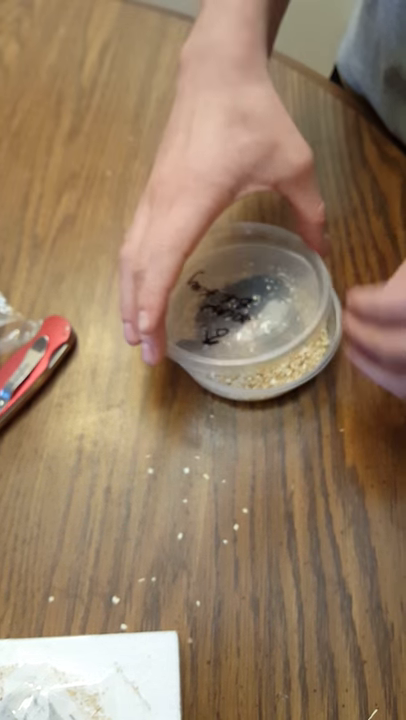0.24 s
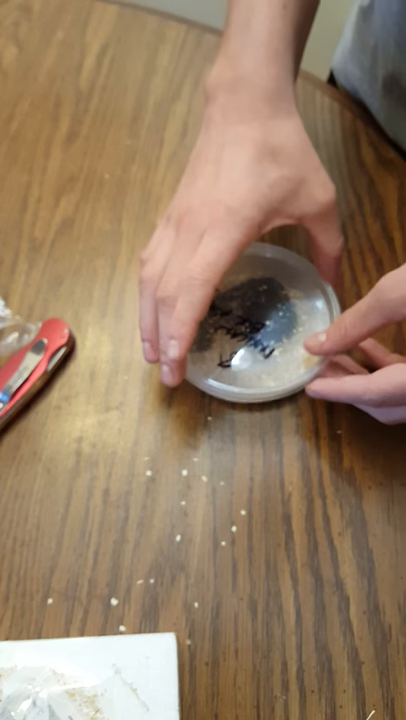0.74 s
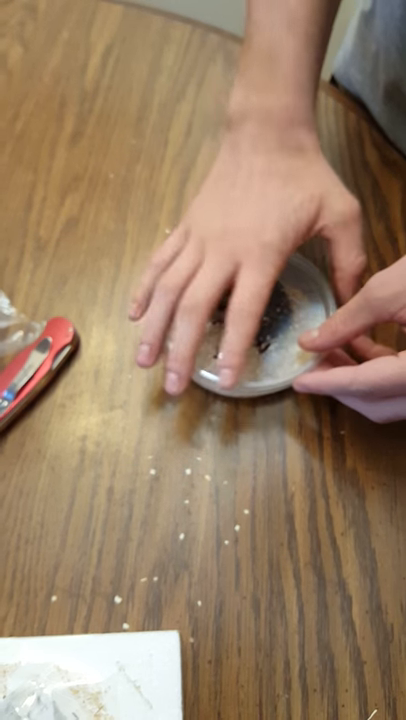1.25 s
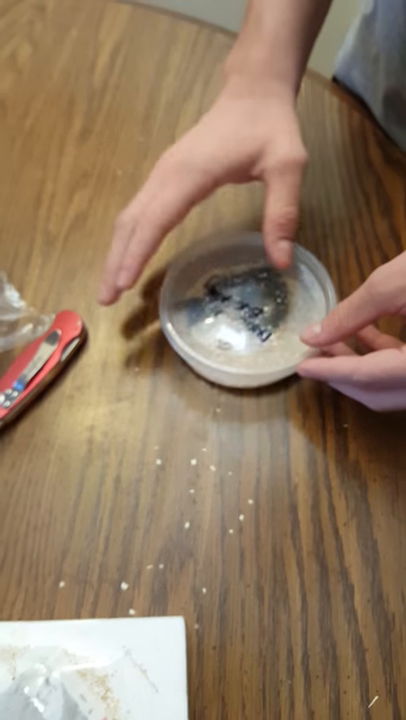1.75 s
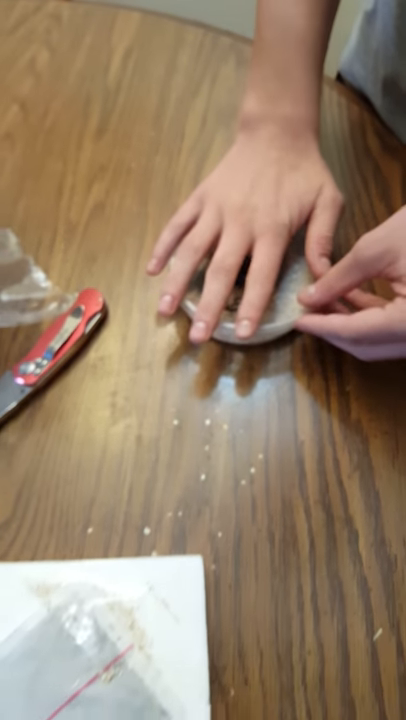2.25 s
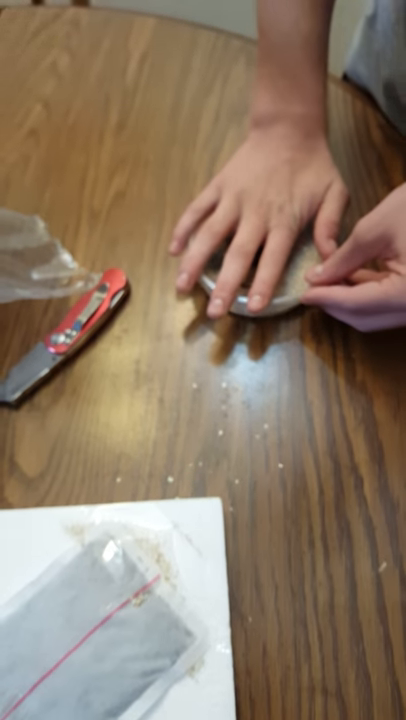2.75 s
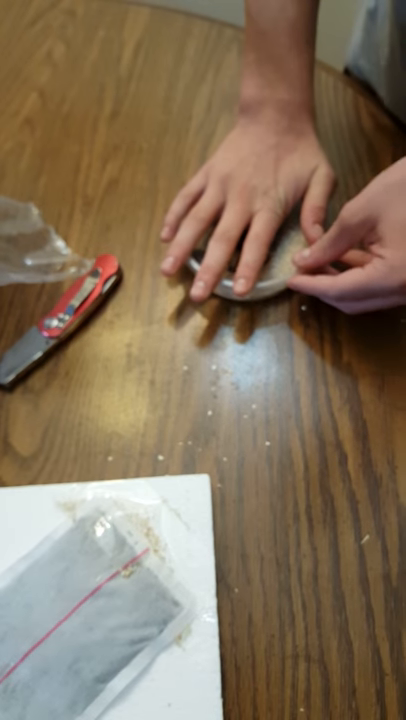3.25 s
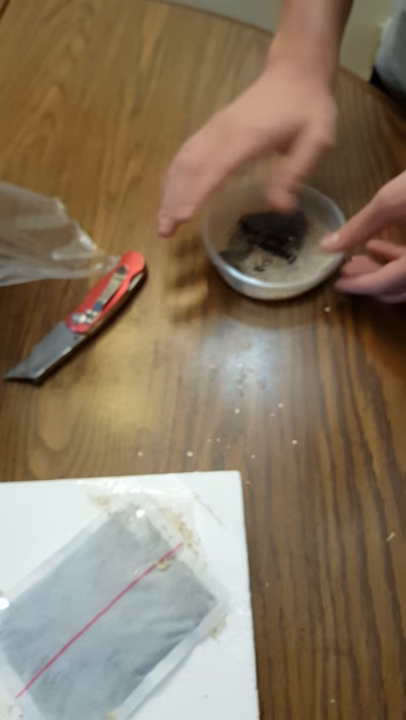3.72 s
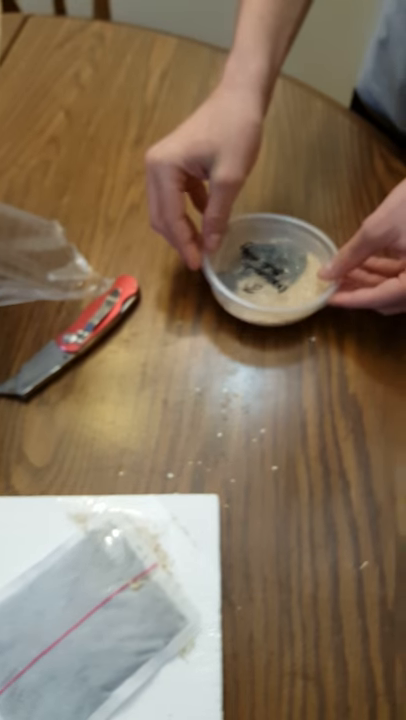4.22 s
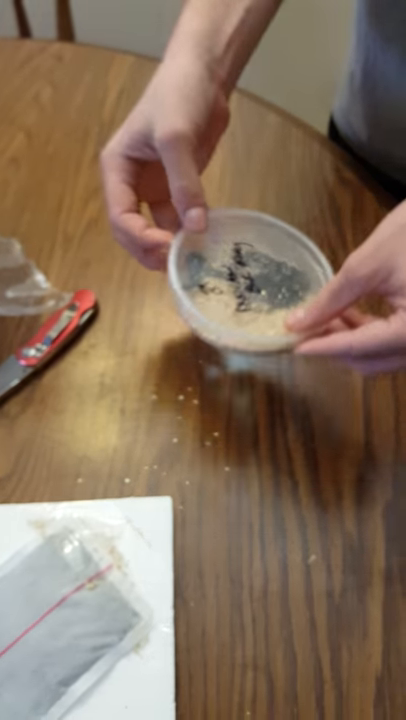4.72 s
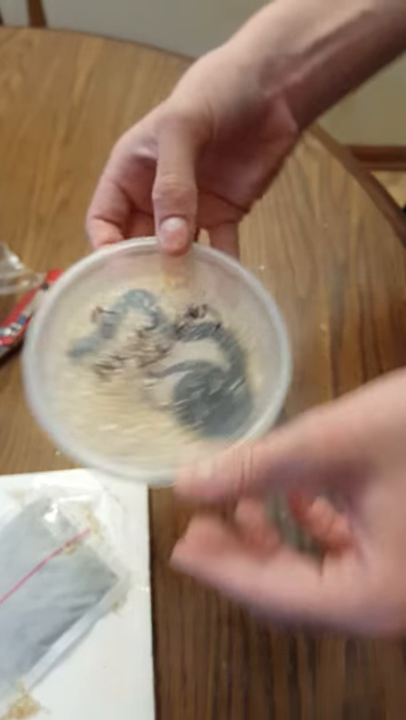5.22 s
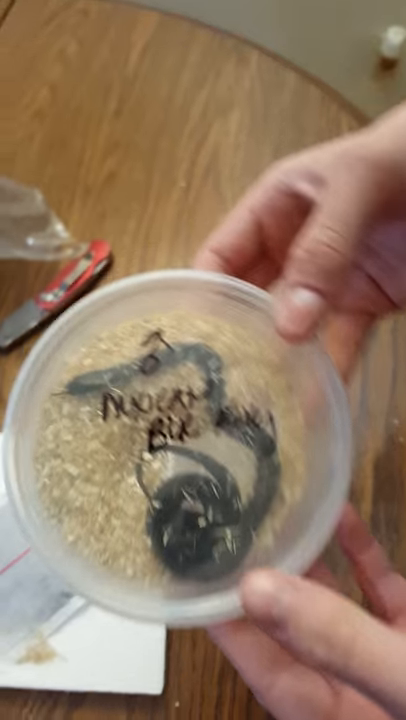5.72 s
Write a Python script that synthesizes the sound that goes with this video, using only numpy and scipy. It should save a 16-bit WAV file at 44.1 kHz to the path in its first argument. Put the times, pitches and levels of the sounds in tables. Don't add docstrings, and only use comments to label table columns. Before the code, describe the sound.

Close stereo microphone in a quiet room with a faint low hum. A loose plastic lid rattles and dry bedding trickles, then the rim slips in small hollow ticks. Pressed harder, it snaps loudly with a thump into the wooden table and zips shut. A short creak, skin rubbing, scuffs on wood and a distant hollow knock follow.

```python
import sys
import numpy as np
from scipy import signal
from scipy.fft import rfft, irfft
from scipy.io import wavfile

SR = 44100
rng = np.random.default_rng(int(sys.argv[2]) if len(sys.argv) > 2 else 0)


def decibels_to_gain(level_db):
    exponent = np.asarray(level_db, float) / 20
    return 10 ** exponent


def materialize(psi):
    bounded = np.clip(np.atleast_2d(psi).T, -1, 1)
    quanta = np.round(bounded * 32767).astype(np.int16)
    wavfile.write(sys.argv[1], SR, quanta)


N = 263277

# frequency in Hz, left-right likeness from -1 to 1.
LIKENESS = [(60, 0.57), (170, 0.81), (340, 0.38), (700, 0.22), (1400, -0.56), (2500, 0.052), (8000, -0.19)]
PORT_LAG = 4


def rms_one(x):
    return x / np.sqrt(np.mean(x ** 2) + 1e-20)


def peak_one(x):
    return x / (np.max(np.abs(x)) + 1e-20)


def in_time(rows):
    s, *columns = np.transpose(rows)
    return [np.interp(np.arange(N) / SR, s, c) for c in columns]


def at_hz(points, hz):
    point_hz, value = np.array(points).T
    return np.interp(np.log(hz), np.log(point_hz), value)


def drift(rate):
    r = np.exp(-80 * np.pi * rate / SR)
    white = rng.standard_normal(N // 40 + 2002)
    slow = signal.lfilter([1], [1, -2 * r, r * r], white)[2000:]
    return np.interp(np.arange(N) / 40, np.arange(len(slow)), rms_one(slow))


def ring(x, hz, t60):
    r, w = decibels_to_gain(-60 / (t60 * SR)), 2 * np.pi * hz / SR
    return signal.lfilter([0, np.sin(w)], [1, -2 * r * np.cos(w), r * r], x + 1e-18)


def resonance(x, hz, width_hz):
    r = np.exp(-np.pi * width_hz / SR)
    top = np.array([1, 0, -1]) * (1 - r * r) / 2
    return signal.lfilter(top, [1, -2 * r * np.cos(2 * np.pi * hz / SR), r * r], x)


def band(x, low_hz, high_hz):
    return signal.sosfilt(signal.butter(2, [low_hz, min(high_hz, .45 * SR)], "band", fs=SR, output="sos"), x)


def add(out, sound, s, pan_db):
    at = round(s * SR)
    out[:, at:at + len(sound)] += decibels_to_gain([[pan_db / 2], [-pan_db / 2]]) * sound[:N - at]


def burst(length_ms, noise):
    u = np.arange(len(noise)) / SR / max(length_ms * 0.0011, 2e-4)
    return u * np.exp(-2 * u) * noise * np.abs(noise)


def stereo_noise(mid, side, hz):
    alike = np.clip(at_hz(LIKENESS, hz), -1, 1)
    return np.sqrt(1 + alike) * mid + np.sqrt(1 - alike) * side * [[1], [-1]]


def appliance_hum():
    # centre in Hz, width in Hz, level in dB rms.
    hums = [(120.64, 7, -75.5), (65.3, 2.9, -83.5), (238.9, 16.6, -77.5)]
    shake = rng.standard_normal(N)
    hum = sum(decibels_to_gain(db) * rms_one(resonance(resonance(shake, hz, w), hz, w)) for hz, w, db in hums)
    line_hz, line_db = 120, -75.5
    phase = 2 * np.pi * line_hz * np.arange(N) / SR + 0.74 * drift(1.33)
    return hum + decibels_to_gain(line_db) * np.sqrt(2) * np.sin(phase)


def room_air():
    # frequency in Hz, level in dB per Hz.
    air_spectrum = [(15, -48), (25, -15), (92, -15.5), (123, 4.5), (185, -20), (242, -6.5), (373, -13.5),
                    (575, -15.5), (796, -11.5), (863, -15.5), (1190, -18), (1400, -16), (3250, -25),
                    (6210, -43.5), (16000, -31.5)]
    out, together, edges = 0, drift(1.5), 22 * 2 ** np.arange(0, 9.6, .5)
    white = rng.standard_normal((2, 2, N))
    for k, (low, high) in enumerate(zip(edges, edges[1:])):
        mid, side = band(white[k % 2], low, high)
        hz = np.sqrt(low * high)
        out = out + decibels_to_gain(at_hz(air_spectrum, hz) + 0.2 * together) * stereo_noise(mid, side, hz)
    return decibels_to_gain(-64.5) * rms_one(out)


def room(x):
    # frequency in Hz, decay t60 in seconds.
    decay = [(100, 0.41), (400, 0.32), (1000, 0.34), (3000, 0.33), (8000, 0.19), (15000, 0.12)]
    t, echo = np.arange(SR // 2) / SR, 0
    white = rng.standard_normal((2, len(t)))
    for low in 60 * 2. ** np.arange(8):
        mid, side = band(white, low, 2 * low)
        echo = echo + stereo_noise(mid, side, 1.25 * low) * decibels_to_gain(-60 * t / at_hz(decay, 1.66 * low))
    echo *= np.clip((t - .003) / 0.0022, 0, 1)
    return signal.fftconvolve(x[None], echo / np.sqrt(np.sum(echo ** 2) / 2))[:, :N]


def far_knock():
    # start in seconds, peak in dB.
    knocks = [
        (5.198, -27),
    ]
    # frequency in Hz, level in dB, t60 in seconds.
    hollow = [(561, -4.5, 0.035), (706, -1.5, 0.0197), (970, -4.5, 0.055), (1560, 0, 0.015),
              (2270, 1, 0.0047)]
    blow, rattle = np.zeros((2, N))
    for s, db in knocks:
        at = round(s * SR)
        blow[at] = decibels_to_gain(db - 6.5)
        rattle[at:][:3000] = decibels_to_gain(db - 13.5) * peak_one(burst(12.6, rng.standard_normal(3000)))
    push = band(blow, 190, 1300) + decibels_to_gain(-13.0) * rattle
    body = sum(decibels_to_gain(db) * ring(push, hz, t60) for hz, db, t60 in hollow)
    return body + decibels_to_gain(-16) * band(rattle, 900, 3200)


def table():
    # start in seconds, peak in dB, sharpness in Hz, sway of the legs in dB.
    thumps = [
        (2.138, -46, 497, -13),
        (2.653, -28, 515, -4),
        (2.821, -33, 475, -4),
        (2.98, -48, 500, 0),
        (3.139, -53.5, 500, 4),
        (4.404, -50, 700, -30),
        (5.057, -47, 500, 6.5),
    ]
    # frequency in Hz, level in dB, t60 in seconds.
    top_modes = [(42, -1.5, 0.37), (130.7, -6.5, 0.33), (141.2, -13, 0.36), (197, 4, 0.071),
                 (305, 4, 0.062), (414, 4.5, 0.075), (557, -7, 0.081)]
    out, strength = np.zeros((2, N)), rng.normal(0, 4.6, (len(thumps), len(top_modes)))
    for (s, db, sharp_hz, sway_db), own_db in zip(thumps, strength):
        push = np.exp(-2 * np.pi * sharp_hz * np.arange(16000) / SR)
        sway, *modes = [decibels_to_gain(mode_db + o) * ring(push, hz, t60)
                        for (hz, mode_db, t60), o in zip(top_modes, own_db)]
        add(out, decibels_to_gain(db) * peak_one(sum(modes) + decibels_to_gain(sway_db) * sway), s, 0)
    return out


def bedding():
    # time in seconds, level in dB.
    trickle = [(0.0, -63), (0.06, -55), (0.085, -61.5), (0.105, -58), (0.135, -60), (0.178, -53.5),
               (0.203, -55), (0.21, -62.5), (0.26, -77)]
    # centre in Hz, width in Hz, level in dB.
    plastic = [(1400, 490, 1), (6000, 900, -5.5), (7800, 900, -0.5), (8740, 620, 6), (9100, 600, 2),
               (9740, 570, -1.5), (12500, 3300, -14.5)]
    grains = rng.standard_normal((2, N)) * (rng.random((2, N)) < 5000 / SR)
    rustle = sum((-1) ** k * decibels_to_gain(db) * resonance(grains, hz, w) for k, (hz, w, db) in enumerate(plastic))
    level_db, = in_time(trickle + [(trickle[-1][0] + 0.058, -120)])
    return decibels_to_gain(level_db + 2.2 * drift(60)) * rms_one(rustle)


def stroke_gains():
    # crest in seconds, peak in dB, seconds to swell 20 dB, seconds to fade 20 dB,
    # lightness of touch in dB.
    fingers = [(0.01, -64, 3, 0.21, 4), (0.06, -61, -0.15, 0.14, 0), (0.185, -59.5, 0.15, -0.09, 0),
               (0.7, -76, -0.5, 0.5, 2.5), (1.03, -68.5, -0.17, 0.33, 1.5), (1.29, -66, -0.2, 0.55, -6.5),
               (1.87, -60.5, 0.07, 0.24, 0), (2.046, -67, 0.07, 0.6, 0.7), (2.258, -67.5, 0, 0.2, -1),
               (2.815, -54.5, 0.05, 0.18, 3), (3.53, -69, 0.1, 0.6, -4.5), (4.006, -66, 0.02, 0.14, 2.5),
               (4.377, -62, 0.18, 0.15, -6), (4.468, -61.5, 0.13, 0.13, 3), (4.64, -77, 1, 0.3, -1),
               (5.06, -64.5, -0.07, 0.6, -1.5), (5.155, -63, 0.01, 0.22, 4.5), (5.55, -80, 0, 17, 6.5),
               (5.85, -80, 1.5, 11, 2.5)]
    flexes = [(0.966, -59, 0.38, 0.23, 0.5), (1.15, -64.5, .1, 0.45, 9), (2.17, -56.5, 0.083, 0.13, -8.5),
              (2.3, -66.5, .08, 0.2, 7), (2.695, -45, 0.067, 0.075, -8), (2.735, -51.5, 0.05, 0.055, -13),
              (2.19, -61.5, .04, .1, 0), (1.04, -63, .05, 0.04, -6), (2.89, -47.5, 0.14, 0.052, 0.5),
              (2.955, -63.5, 0.055, 0.089, 11), (3.2, -57, 0.063, 0.11, -2),
              (3.255, -53.5, 0.07, 0.12, -5.5), (3.38, -70.5, 0.088, 0.15, 23),
              (5.21, -45.5, 0.015, 0.15, -4)]
    drags = [(0.13, -65.5, 0.064, 0.33, 7), (1.57, -67, 0.45, 0.26, -2), (2.63, -64.5, 0.2, .05, 7),
             (2.675, -43.5, 0.025, 0.076, -5), (3.214, -60, 0.081, 0.048, 2.5),
             (4.245, -55, 0.036, 0.065, 2), (4.262, -51, 0.017, 0.078, 3.5),
             (4.288, -52.5, 0.069, 0.1, 3.5), (4.407, -52.5, 0.014, 0.073, -6.5),
             (4.465, -52.5, 0.2, 0.08, 0), (5.0, -69.5, 0.72, 0.092, -2), (5.1, -56, 0.14, 0.23, 1),
             (5.43, -66.5, 0.38, 0.39, -4), (5.96, -67, 1, .2, -3)]
    scrapes = [(1.6, -56.5, 0.023, 0.015, -3), (1.86, -60.5, 0.031, 0.091, 0.1),
               (3.215, -53, 0.062, 0.069, -2.5), (3.285, -63, 0.07, 0.11, -3), (4.01, -62, 0.028, 0.033, 1),
               (4.17, -63.5, 0.019, 0.1, -2), (4.205, -61.5, 0.058, 0.12, -2),
               (5.212, -53.5, 0.014, 0.16, -4)]
    scrape_share = (-20, -1, 2, -30)
    light_touch = (-0.89, -0.07, 0.45, 1)
    resting = (-81.5, -79, -80.5, -84.5)
    contacts = [(fingers, (-10.5, -0.7, -2.5, -3.5)), (flexes, (-11.5, -1.15, -4.5, -33)),
                (drags, (-0.8, -7.5, -2.5, -22)), (scrapes, scrape_share)]
    t = np.arange(0, N + 64, 64) / SR
    power = decibels_to_gain(np.array(resting))[:, None] ** 2 + 0 * t
    for rows, share_db in contacts:
        for s, db, swell_s, fade_s, light_db in rows:
            swell_s, fade_s = np.maximum([swell_s, fade_s], .003)
            level_db = db - 20 * np.where(t < s, (s - t) / swell_s, (t - s) / fade_s)
            body_db = np.array(share_db) + light_db * np.array(light_touch)
            power = power + decibels_to_gain(level_db + body_db[:, None]) ** 2
    return [np.interp(np.arange(N) / SR, t, np.sqrt(p)) for p in power]


def rubbing(per_s, lumpy_db, spread):
    # centre in Hz, width in Hz, level in dB.
    bodies = [
        [(220.5, 91, 1), (320.2, 174, -6), (450.4, 154, -3)],
        [(787, 230, -0.5), (918, 250, 0.5), (1200, 380, -3.5)],
        [(1803, 780, 4), (2626, 1020, 0.5), (3696, 1040, -10)],
        [(5615, 2400, 3.5), (8640, 2400, 2.5), (11800, 3300, -24), (14300, 2400, -12)],
    ]
    sizes = decibels_to_gain(1.8 * np.minimum(rng.exponential(1, (2, N)), 5))
    grains = sizes * (rng.random((2, N)) < per_s / SR)
    signs = rng.choice([-1, 1], N)
    clumps, out = drift(70), 0
    for gain, body, apart in zip(stroke_gains(), bodies, spread):
        near, other = sum(decibels_to_gain(db) * resonance(grains * np.roll(signs, int(hz)), hz, w) for hz, w, db in body)
        pair = rms_one(near + apart * other * [[1], [-1]])
        out = out + gain * decibels_to_gain(lumpy_db * (clumps + .6 * drift(40))) * pair
    return out


def squeaks():
    # start in seconds, level in dB, first pitch in Hz, last pitch in Hz, length in ms.
    skids = [
        (2.241, -62, 7360, 10500, 14),
        (2.257, -63, 7820, 12500, 8.1),
    ]
    out = np.zeros((2, N))
    for s, db, from_hz, to_hz, length_ms in skids:
        u = np.linspace(0, 1, int(length_ms * SR / 1000))
        phase = 2 * np.pi * np.cumsum(from_hz + (to_hz - from_hz) * u) / SR
        add(out, decibels_to_gain(db) * np.sin(np.pi * u) * np.sin(phase), s, 0)
    return out


def skin_ticks():
    # start in seconds, peak in dB, centre in Hz, width in Hz, length in ms.
    ticks = [(1.426, -58, 13700, 3000, 2.), (1.5288, -42, 10000, 16000, 0.2),
             (1.589, -49.5, 2920, 500, 6.8), (1.604, -44.5, 6000, 8000, 1), (4.4033, -41, 315, 130, 1.2),
             (2.7774, -30.5, 8100, 9000, 0.54), (3.394, -47, 11400, 4000, 4.7),
             (3.517, -55, 10000, 3000, 2.7), (3.524, -46, 11000, 6000, .6),
             (3.603, -48, 11100, 12000, 0.69), (4.196, -56, 3350, 300, 20.), (4.258, -47, 2800, 3000, 2.5),
             (3.6305, -46, 10500, 12000, 0.66), (4.2305, -41, 1490, 900, 1.1),
             (4.933, -49, 4380, 2500, 1.1), (5.0863, -43, 9200, 7000, 0.51), (5.922, -51, 8160, 5080, 0.8)]
    out, noise = np.zeros((2, N)), rng.standard_normal((len(ticks), 3000))
    for (s, db, hz, width_hz, length_ms), scratch in zip(ticks, noise):
        add(out, decibels_to_gain(db) * peak_one(resonance(burst(length_ms, scratch), hz, width_hz)), s, 0)
    return out


def creak():
    # time in seconds, slips per second, level in dB.
    bend = [
        (3.151, 113, -56.5),
        (3.172, 138, -45.5),
        (3.2, 200, -43.5),
        (3.228, 670, -55.5),
    ]
    t = np.arange(N) / SR
    per_s, level_db = in_time(bend)
    turns = np.cumsum(per_s * (t > bend[0][0]) * (t < bend[-1][0])) / SR
    pulses = np.diff(np.ceil(turns), prepend=0) * decibels_to_gain(level_db + rng.normal(0, 1.0, N))
    grit = rng.standard_normal(N)
    tick, scrape = (signal.lfilter([1], [1, -hold], pulses) * grit for hold in (.92, .965))
    bright = band(tick, 5100, 7200) + decibels_to_gain(-1) * band(tick, 8600, 11400)
    return decibels_to_gain(3.5) * bright + decibels_to_gain(9) * band(scrape, 780, 2700)


def rim_slips():
    # start in seconds, peak in dB, cup ring in Hz,
    # wall in dB re ring, slip length in ms.
    seeking = [(0.664, -63, 894, -27, 2.7), (0.776, -61.5, 1050, -15.5, 1.5), (0.884, -62, 1080, -24, 5.5),
               (0.909, -38, 935, -22, 0.68), (0.929, -66, 966, -19, 2), (0.965, -55, 900, -15, 5.1),
               (0.974, -43, 830, -19.5, 4.), (0.987, -42.5, 895, -22, 6.4), (1.0, -44.5, 885, -23, 1.3),
               (1.039, -54, 915, -23, 3.4), (1.09, -58, 770, -26, 3.1), (1.131, -55.5, 890, -21, 4.2),
               (1.14, -51.5, 940, -24, 4.), (1.151, -46, 870, -29, 7.7), (1.187, -47, 830, -36, 4.1),
               (1.252, -40.5, 806, -33.5, 1.7)]
    pressing = [(1.4993, -48, 650, -18.5, 3.8), (1.528, -49, 850, -13, 1), (1.588, -50.5, 840, -17, 1.1),
                (1.603, -48, 920, -16, 1.34), (1.825, -56, 820, -27, 1), (2.1406, -33.5, 970, -18.5, 1.3),
                (2.1447, -30.5, 954, -26, 1.5), (2.1534, -34.5, 990, -26, 1.6), (2.808, -49, 900, -10, 3.3),
                (2.817, -48, 850, -8, 2.5), (2.837, -45, 980, -10, 3.6), (2.136, -51, 900, -13, 2.),
                (2.888, -49, 794, -20, 2.4), (2.907, -54, 1000, -13, 3.), (3.151, -53, 800, -18, 3.),
                (3.562, -62, 1000, -16, 1.1), (2.858, -44, 1000, -8.5, 4.7), (2.879, -47, 940, -18, 3.3),
                (3.602, -58, 1090, -8, 1.5), (3.629, -49.5, 1050, -15.5, 2.8), (4.933, -56, 885, -10, 1.7)]
    lowering = [(0.03, -58, 800, -27, 3.), (0.047, -55, 810, -23, 3.6), (0.057, -51.5, 860, -20, 3.4),
                (0.07, -55, 1200, -23, 3.), (0.096, -52, 950, -22, 2.2), (0.104, -52, 1080, -20, 1.7),
                (0.113, -52, 1040, -16, 2.5), (0.143, -52, 1130, -20, 2.5), (0.154, -54, 1200, -20, 3.5),
                (0.168, -45, 1280, -24, 2.3), (0.176, -46, 1135, -20, 1.17), (0.189, -56, 1200, -17, 2.7)]
    phases = [(seeking, 4), (pressing, -6.5), (lowering, 1)]
    slips = [(*row, crack_db) for rows, crack_db in phases for row in rows]
    out, noise = np.zeros((2, N)), rng.standard_normal((len(slips), 3, 4000))
    for (s, db, hz, wall_db, length_ms, crack_db), (push, rattle, scratch) in zip(slips, noise):
        push = band(burst(length_ms, push), 310, 3300)
        air = ring(push, hz, t60=0.029)
        air = air + decibels_to_gain(4.5) * ring(push, 1.113 * hz, t60=0.012)
        air = air + decibels_to_gain(-13) * ring(push, 0.32 * hz, t60=0.005)
        wall = band(burst(1.3 * length_ms, rattle), 1500, 5500)
        crack = band(burst(1.7 * length_ms, scratch), 6900, 10900)
        edge = peak_one(wall) + decibels_to_gain(crack_db - 0.5) * peak_one(crack)
        add(out, decibels_to_gain(db) * (peak_one(air) + decibels_to_gain(wall_db + 12.5) * edge), s, 0)
    return out


def zip_shut():
    # crest in seconds, peak in dB, cup ring in Hz, wall in dB re ring, crack in dB re ring,
    # build-up in ms.
    zips = [
        (2.8269, -23.5, 960, -2.5, -0.5, 3.5),
    ]
    # centre in Hz, width in Hz, level in dB.
    wall_bands = [(1450, 380, -12), (2200, 600, -12), (2860, 410, -8), (3730, 560, -8.5), (4520, 720, -8)]
    out, t = np.zeros((2, N)), np.arange(16000) / SR - .03
    for s, db, hz, wall_db, crack_db, build_ms in zips:
        swell = np.where(t < 0, np.exp(t / (build_ms * 0.001)), np.exp(-t / 0.0035))
        push, rattle, scratch = swell * np.pad(rng.standard_normal((3, 4000)), ((0, 0), (0, 12000)))
        air = ring(band(push, 650, 1320), hz, t60=0.012)
        air = air + decibels_to_gain(-3.0) * ring(band(push, 900, 1580), 1.465 * hz, t60=0.013)
        wall = sum(decibels_to_gain(share_db) * peak_one(band(rattle, wall_hz - w / 2, wall_hz + w / 2))
                   for wall_hz, w, share_db in wall_bands)
        wood = peak_one(ring(swell, 112.8, t60=0.34) + decibels_to_gain(-10) * ring(swell, 57, t60=0.23))
        crack = band(scratch, 5000, 15500) + decibels_to_gain(8) * resonance(scratch, 9500, 2500)
        layers = peak_one(air) + decibels_to_gain(wall_db) * wall + decibels_to_gain(crack_db) * peak_one(crack) + decibels_to_gain(-16) * wood
        add(out, decibels_to_gain(db) * layers, s - .03, 1.5)
    return out


def snap():
    # start in seconds, peak in dB, pulse in Hz, crackle in dB re pulse, crackle length in ms.
    snaps = [
        (2.6504, -13.5, 820, -12.5, 18.3),
    ]
    # frequency in Hz, level in dB re pulse, t60 in seconds.
    seated = [(134, -21.5, 0.12), (162, -27, 0.26), (201, -20.5, 0.13), (269, -21, .09),
              (332, -24.5, 0.079), (431, -26.5, .1), (712, -30.5, .25), (850, -38, 0.14), (980, -35, 0.22),
              (1027, -25.5, 0.27), (1055, -34, .35), (1214, -28, 0.067)]
    out, t = np.zeros((2, N)), np.arange(16000) / SR
    for s, db, hz, crackle_db, crackle_ms in snaps:
        late = t - .0023
        swing = -np.cos(2 * np.pi * hz * late) * np.exp(-(late / np.where(late < 0, .0009, .0004)) ** 2)
        jolt = np.exp(-((late - .0015) / 0.0004) ** 2)
        body = sum(decibels_to_gain(mode_db) * peak_one(ring(jolt, mode_hz, t60)) * (-1) ** k
                   for k, (mode_hz, mode_db, t60) in enumerate(seated))
        envelope = np.exp(-(t / (crackle_ms * 0.00098)) ** 4) * (1 + 1.17 * np.exp(-t / .0015))
        seating = envelope * rng.standard_normal(len(t))
        crackle = sum(decibels_to_gain(share_db) * band(seating, low, high) for low, high, share_db in [
            (490, 1380, 3), (2860, 4700, 0.5), (1830, 2630, 0.5), (5600, 10540, -4), (10000, 15000, -17.5)])
        add(out, decibels_to_gain(db) * swing, s, pan_db=2)
        add(out, decibels_to_gain(db) * (body + decibels_to_gain(crackle_db) * peak_one(crackle)), s, 0)
    return out


def ports(x):
    scatter_hz = 2800
    bass = signal.sosfilt(signal.butter(2, scatter_hz, fs=SR, output="sos"), x)
    treble = list(x - bass)
    for port, lags in enumerate([(5, 13, 31), (9, 19, 23)]):
        for lag in lags:
            taps = np.r_[-.55, np.zeros(lag - 1), 1]
            treble[port] = signal.lfilter(taps, taps[::-1], treble[port])
    left, right = bass + treble
    return np.array([left, np.r_[np.zeros(PORT_LAG), right[:-PORT_LAG]]])


def scene():
    hits = rim_slips() + snap() + zip_shut() + skin_ticks() + table() + creak() + squeaks()
    rub = rubbing(per_s=6000, lumpy_db=1.2, spread=[.2, .6, .9, 1.]) + bedding()
    rub[1] = np.roll(rub[1], PORT_LAG)
    knock = far_knock()
    near = ports(hits) + knock + decibels_to_gain(-8) * room(hits.mean(axis=0) + decibels_to_gain(10.5) * knock)
    steep_top = signal.ellip(10, .5, 50, 15800, fs=SR, output="sos")
    steady = signal.sosfilt(steep_top, rub + room_air() + appliance_hum())
    soft_top = signal.cheby2(8, 40, 16500, fs=SR, output="sos")
    return signal.sosfilt(soft_top, band(near, 55, 20000)) + steady


def band_limit(x):
    return signal.sosfilt(signal.butter(12, 16500, fs=SR, output="sos"), x)


def record(dry):
    # frequency in Hz, left over right in dB.
    balance = [(150, -.5), (340, -3), (680, 1), (1350, -1.5), (2300, 0), (4500, -2), (8000, -1)]
    tilt = at_hz(balance, np.arange(1, N // 2 + 2) * SR / N) / 2
    coloured = irfft(rfft(dry) * decibels_to_gain([tilt, -tilt]), N)
    return band_limit(coloured - .0004)


dry = scene()
out = record(dry)
materialize(out)
```